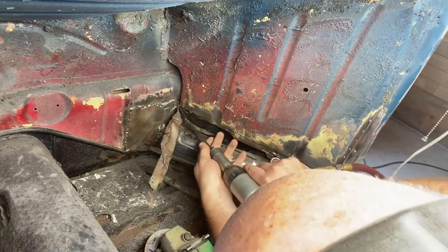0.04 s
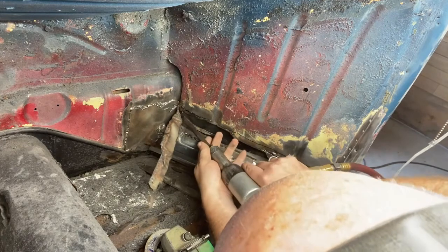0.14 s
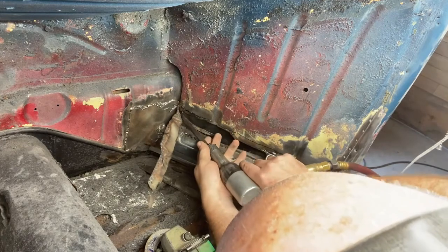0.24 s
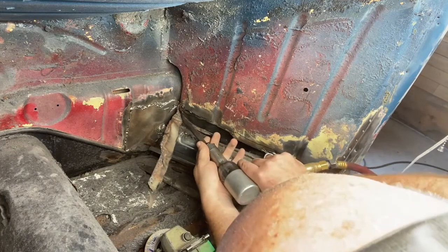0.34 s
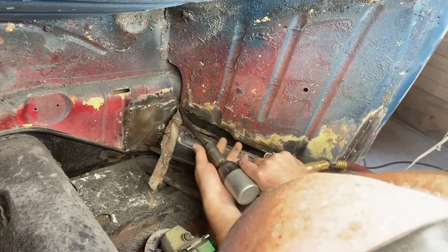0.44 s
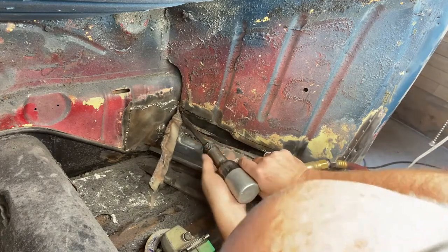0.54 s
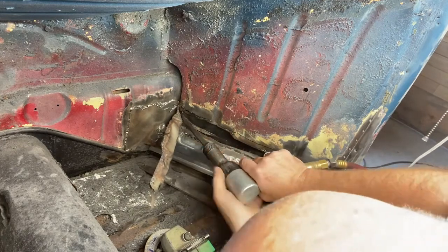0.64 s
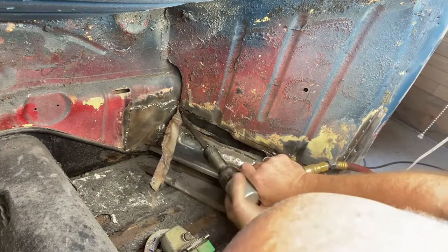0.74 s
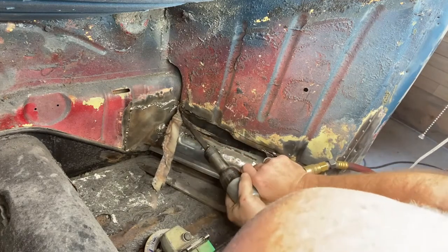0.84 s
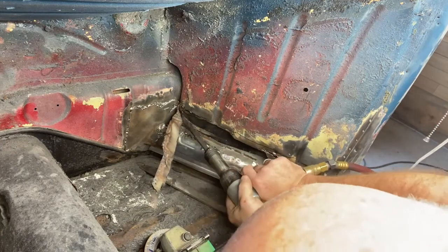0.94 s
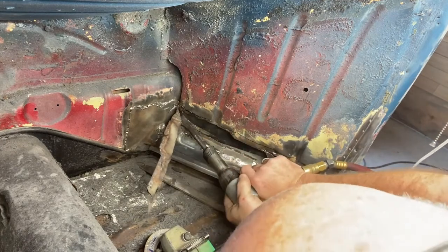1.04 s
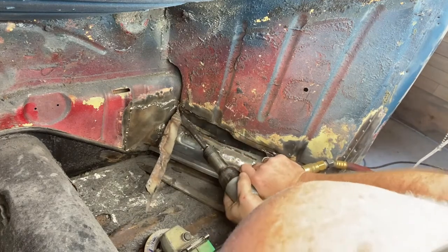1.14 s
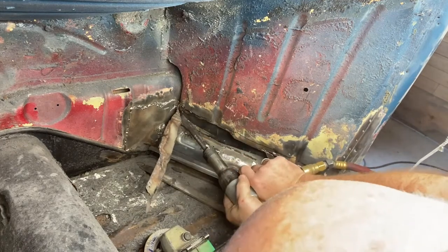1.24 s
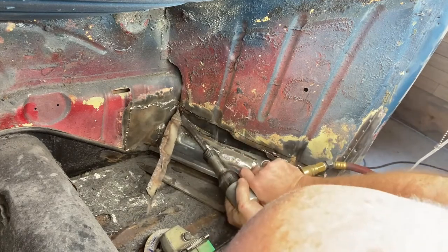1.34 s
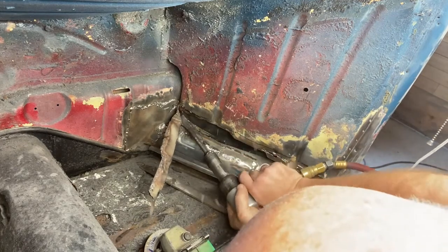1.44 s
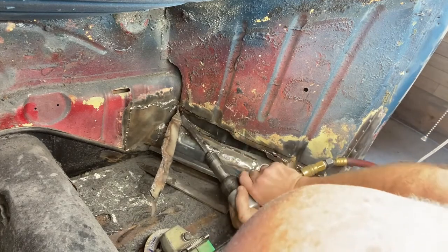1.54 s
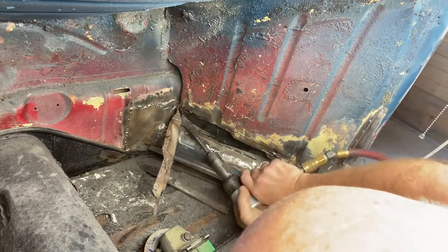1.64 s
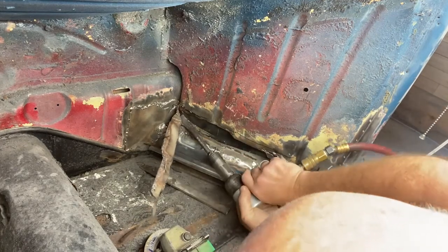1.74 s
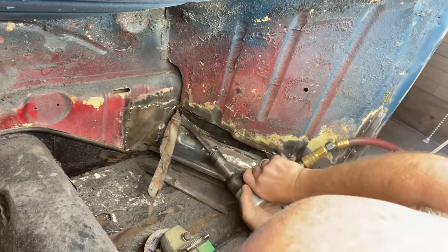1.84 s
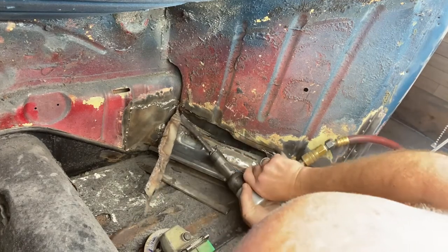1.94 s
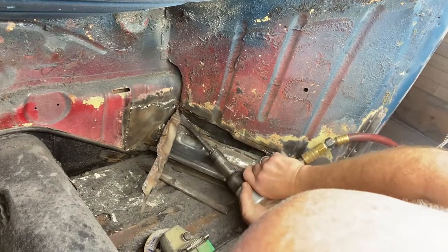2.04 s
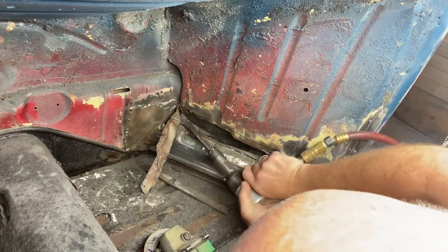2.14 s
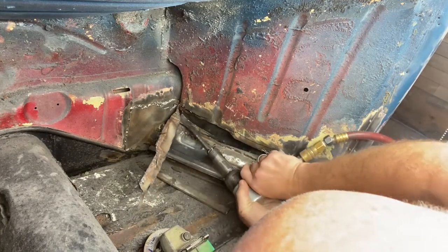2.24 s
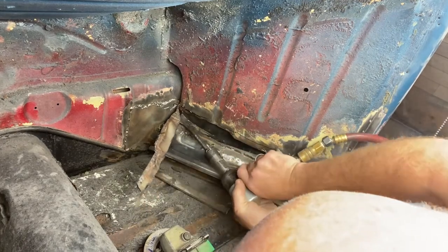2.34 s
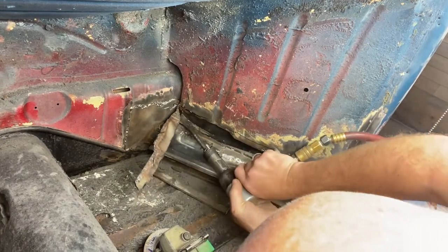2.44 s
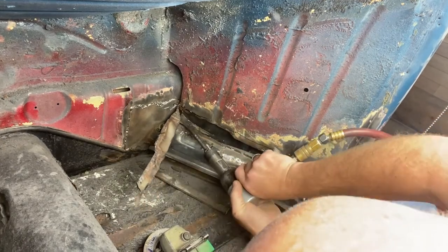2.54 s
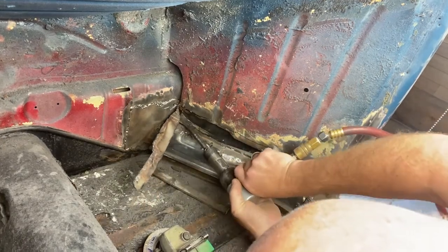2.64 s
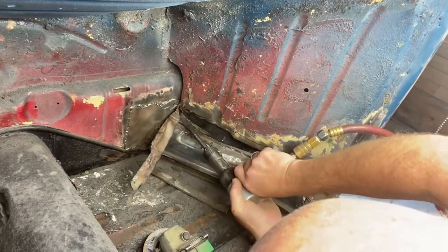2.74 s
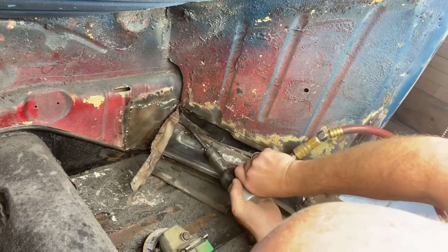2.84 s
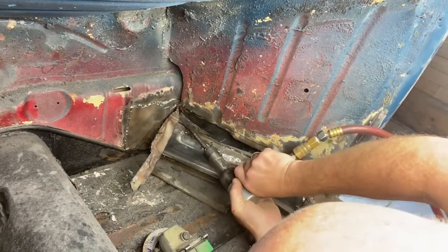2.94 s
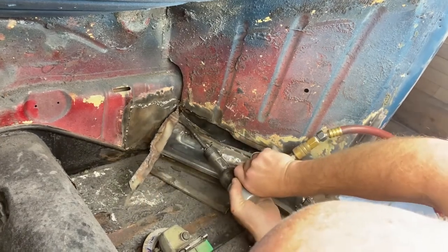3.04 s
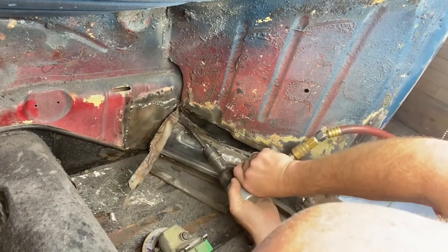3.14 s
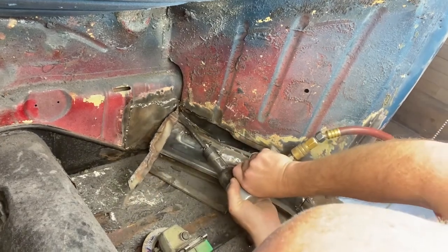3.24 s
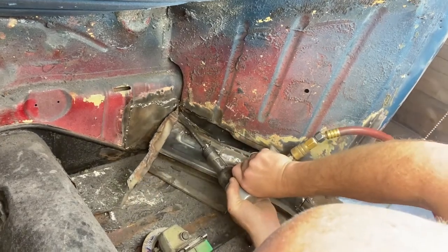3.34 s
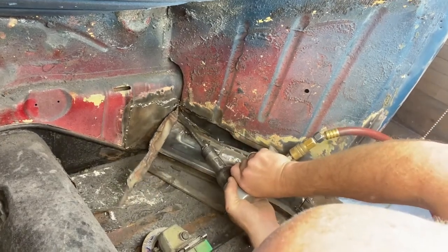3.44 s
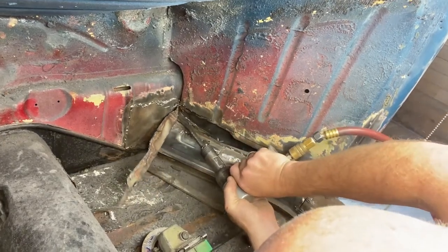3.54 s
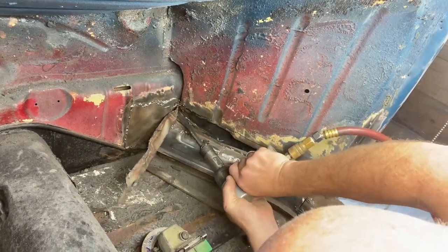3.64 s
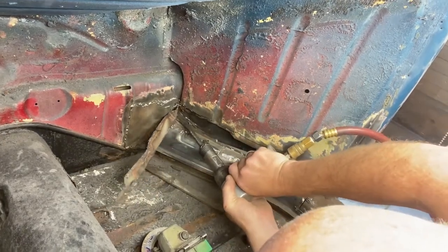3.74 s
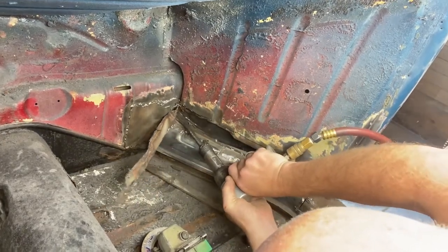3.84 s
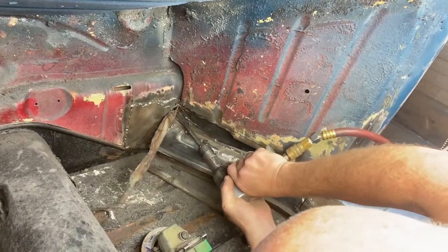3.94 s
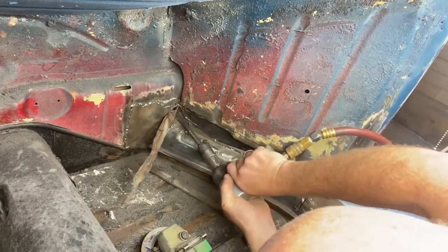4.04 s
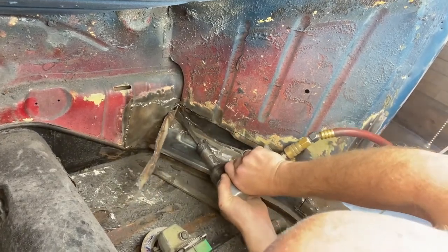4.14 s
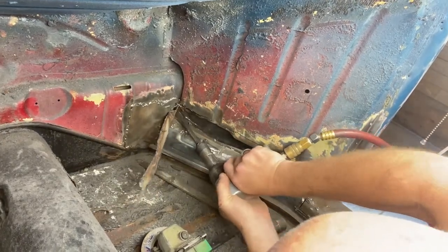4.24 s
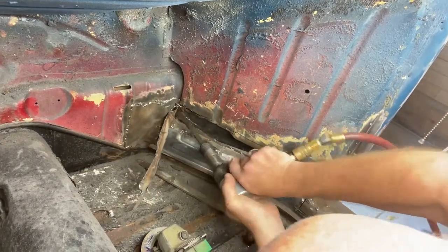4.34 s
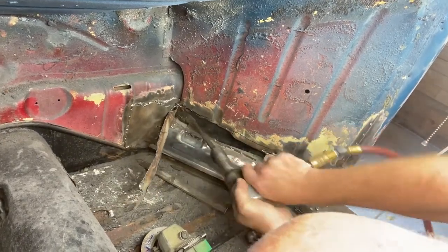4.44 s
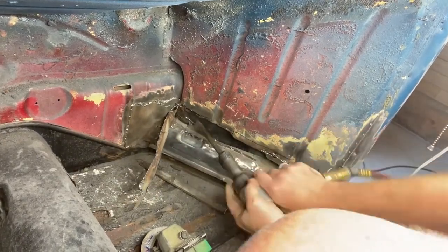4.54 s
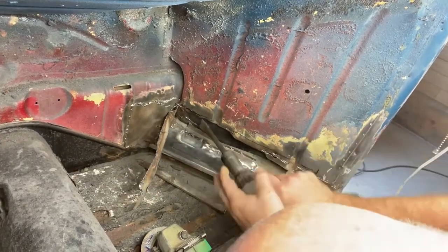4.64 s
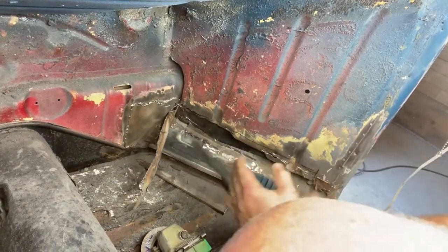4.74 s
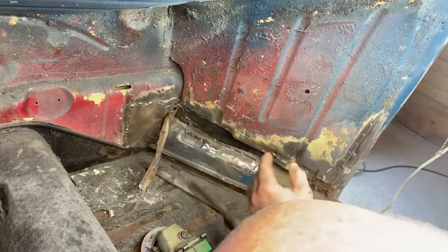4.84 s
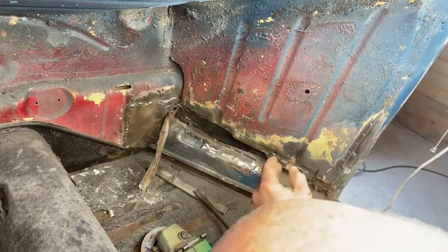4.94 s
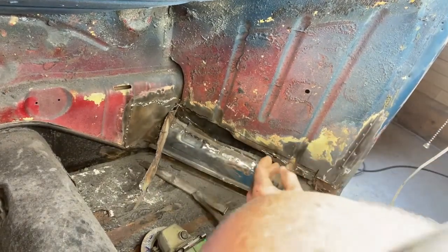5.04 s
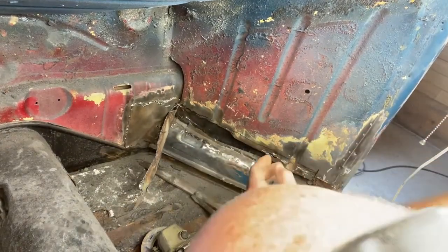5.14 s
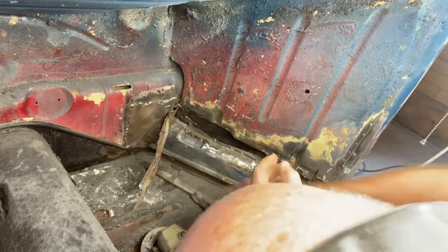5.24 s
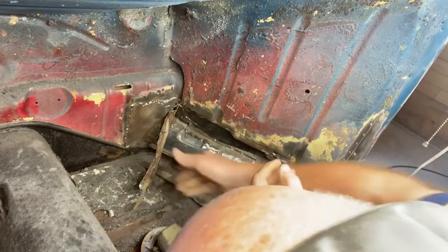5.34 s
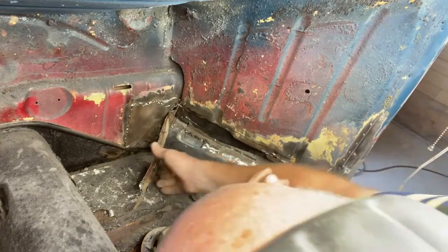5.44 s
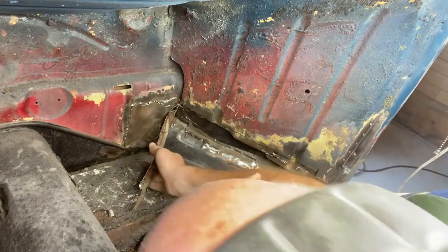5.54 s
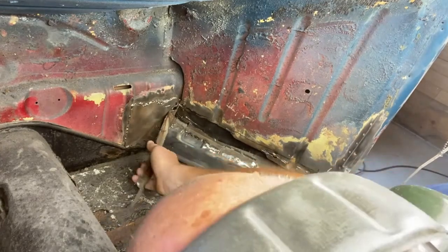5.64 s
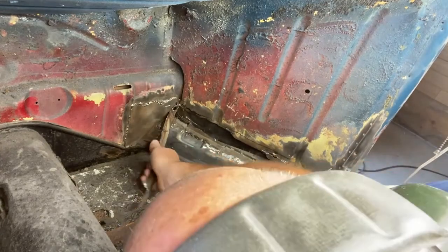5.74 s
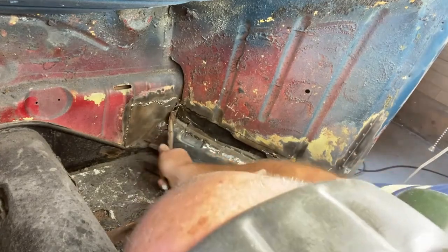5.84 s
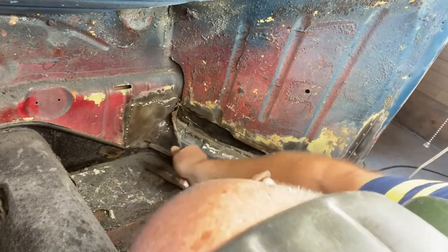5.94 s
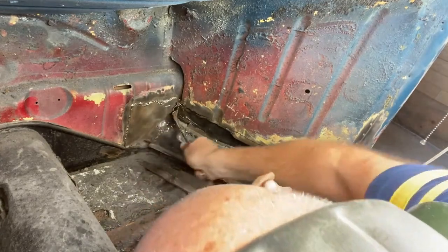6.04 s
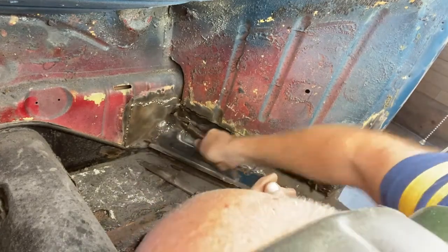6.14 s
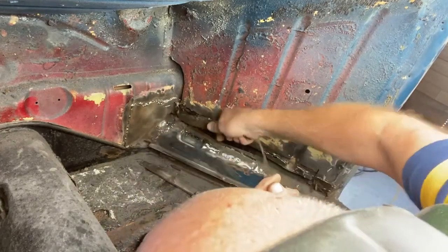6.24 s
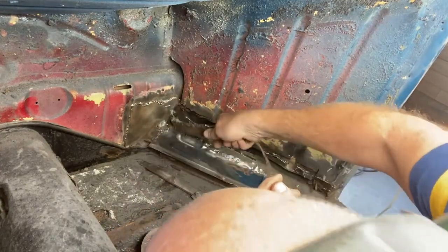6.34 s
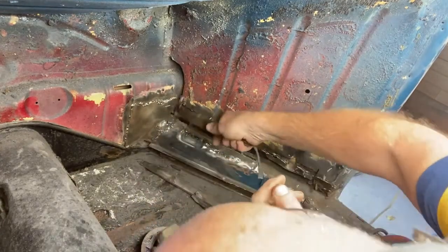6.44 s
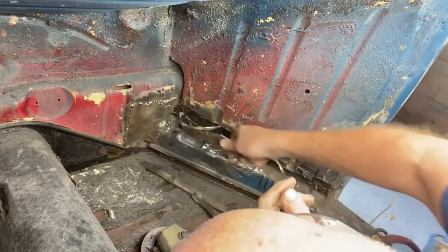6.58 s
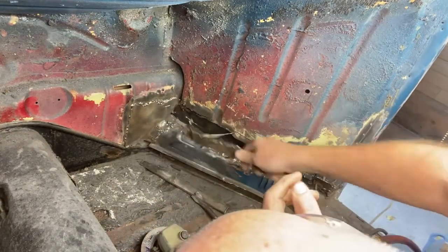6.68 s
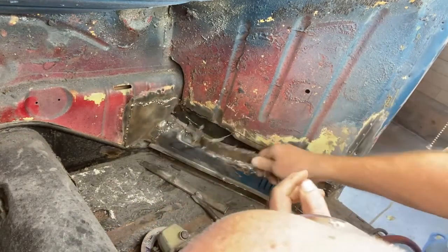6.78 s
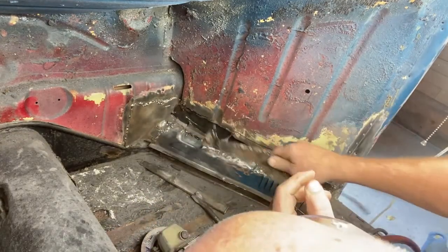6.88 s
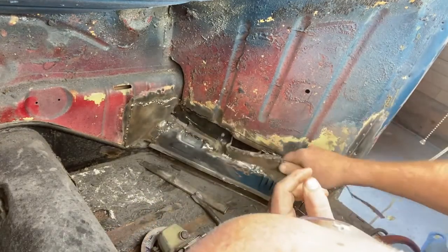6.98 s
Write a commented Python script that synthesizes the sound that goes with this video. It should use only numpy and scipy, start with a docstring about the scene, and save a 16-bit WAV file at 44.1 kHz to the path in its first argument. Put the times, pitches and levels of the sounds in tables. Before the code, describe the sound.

Close stereo recording in a garage: hands and tool knock softly on a rusty car floor, with gritty crunches and low thumps. A puff of air leads into a very brief air chisel burst, then another into a long, loud machine-gun run of bright cracks and sheet clang with hissing exhaust. It stops; the tool clanks down, and a cut metal strip scrapes and knocks.

```python
"""Air chisel on a rusty floor pan in a garage, its steady air noise a coloured random wash.
First, hands and tool knock the metal (excited modes), crunch grit (random grains) and make the pan drone (low modes).
A puff of air leads into a short burst near 1 s, another into a long one from 1.7 to 4.3 s: each blow sounds
bit, sheet and low pan modes, while the exhaust hisses (modulated noise). Afterwards the tool clanks, then loose
metal scrapes and knocks; walls and car body reverberate the knocks, puffs, blows, exhaust and scrapes."""
import sys
import numpy as np
from scipy import signal
from scipy.fft import rfft
from scipy.io import wavfile
from scipy.ndimage import uniform_filter1d

SR = 44100
rng = np.random.default_rng(int(sys.argv[2]) if len(sys.argv) > 2 else 0)


def materialize(psi):
    """Save the field psi as 16-bit PCM at rate SR to the path in sys.argv[1].

    A 1-D psi becomes a single channel; in a 2-D psi each row is a channel.
    """
    bounded = np.clip(np.atleast_2d(psi).T, -1, 1)
    quanta = np.round(bounded * 32767).astype(np.int16)
    wavfile.write(sys.argv[1], SR, quanta)


N = 309141  # length [samples]


def amp(db):
    """Decibel definition: 20 dB is a tenfold amplitude."""
    return 10 ** (np.asarray(db) / 20)


def evened(x):
    """Power normalisation: scales to rms 1."""
    return x / np.sqrt(np.mean(x ** 2) + 1e-20)


def read(points, hz):
    """Logarithmic frequency scale: interpolates a table along it."""
    f, value = np.transpose(points)
    return np.interp(np.log(hz + 1), np.log(f + 1), value)


def curve(tables, t):
    """Level envelopes: gains from tables of (time [s], level [dB], ...), practically silent outside them."""
    total = 0
    for table in tables:
        s, *levels = np.transpose(table)
        total = total + np.array([amp(np.interp(t, s, db, -150, -150)) for db in levels])
    return total


# likeness of left and right: (frequency [Hz], coherence [0 to 1])
COHERENCE = [(60, .93), (130, .65), (290, .4), (640, .3), (1410, .5), (3100, .3), (6800, .4), (15000, .85)]
# stereo balance: (frequency [Hz], left over right [dB])
BALANCE = [(60, 0), (150, 4), (380, 1.5), (950, 1), (2380, 2), (5980, 4.5), (15000, -1.5)]
# stereo phase: (frequency [Hz], lead of left [rad])
PHASE_LEAD = [(40, 2.5), (125, 0.86), (250, 1.5), (550, 2.16), (1460, 1.44), (4650, 1), (5000, -4),
              (5940, -5), (6720, -5.5), (8700, -5), (12300, 3), (16000, -7.5)]


def stereo_spectra(frames, size, colour_db):
    """Partial coherence: two noise channels share a part, with a phase lag and a balance."""
    hz = np.fft.rfftfreq(size, 1 / SR)[:, None]
    a, b, c, d = rng.standard_normal((frames, len(hz), 4)).T
    same = np.clip(read(COHERENCE, hz), -1, 1)
    left = a + 1j * b
    right = same * left + np.sqrt(1 - same ** 2) * (c + 1j * d)
    right = right * np.exp(-1j * read(PHASE_LEAD, hz))
    lean = amp(read(BALANCE, hz) / 2)
    return hz, np.array([left * lean, right / lean]) * amp(read(colour_db, hz))


def steady_noise(size, colour_db):
    """Stationary noise: overlapping random spectra, rms 1."""
    z = stereo_spectra(4 * N // size + 5, size, colour_db)[1]
    return evened(signal.istft(z, nperseg=size, noverlap=3 * size // 4)[1][:, :N])


def dense_ring(colour_db, t60s, seconds):
    """High modal density: countless close modes merge into dying stereo noise, energy 1."""
    frames = int(seconds * SR / 64)
    hz, z = stereo_spectra(frames, size=256, colour_db=colour_db)
    t = np.maximum(np.arange(frames) - 2, 0) * 64 / SR
    t60 = read(t60s, hz)
    decay = amp(-60 * t / t60) / np.sqrt(t60)
    x = signal.istft(z * decay, nperseg=256, noverlap=192)[1][:, 128:]
    return x / np.linalg.norm(x.mean(0))


# times at which the bit stands at seven places along the weld: (time [s])
STATIONS = 1.1, 1.85, 2.25, 2.7, 3.05, 3.5, 4.0


def modes(table, length, s, spread, uneven_db):
    """Modal excitation: decaying sines, weighted by the spot struck at time s and by chance; energy 1."""
    t, x = np.arange(length) / SR, 0
    for hz, t60, *db in table:
        shift, strength, swing = rng.standard_normal(3)
        level_db = np.interp(s, STATIONS[-len(db):], db) + uneven_db * strength
        turn = 2 * np.pi * hz * (1 + spread * shift) * t
        # a quadrature part of opposite sign left and right
        side = (0.3 + 0.28 * swing) * np.array([[1], [-1]]) * np.cos(turn)
        x = x + amp(level_db - 60 * t / t60) / np.sqrt(t60) * (np.sin(turn) + side)
    x = x * np.minimum(t / 0.0006, 1) ** 2
    return x * amp(np.array([[1.2], [-1.2]])) / np.linalg.norm(x.mean(0))


def rattle(lengths, lumpy_db, rise, alike, colour_db, tick):
    """Repeated contact: a solid tick and an uneven run of chatter, partly alike from hit to hit."""
    t = np.arange(2600) / SR
    z = rng.standard_normal((len(lengths), 2, len(t)))
    # correlation from one hit to the next, steady from the first
    fresh = np.sqrt(1 - alike ** 2)
    z[0] /= fresh
    z = signal.lfilter([fresh], [1, -alike], z, axis=0)
    lumps = amp(lumpy_db * evened(uniform_filter1d(z[:, 1], 40)))
    decay = np.exp(-t / lengths[:, None])
    runs = z[:, 0] * lumps * decay * np.minimum(t / rise, 1) ** 2
    # chatter has energy 1 within the colour it feeds
    weight = evened(amp(read(colour_db, np.fft.rfftfreq(len(t), 1 / SR))))
    runs = runs / np.sqrt(np.mean(abs(rfft(runs) * weight) ** 2, 1, keepdims=True))
    return (runs + tick * (t == t[12])) / np.sqrt(1 + tick ** 2)


def strike(times, runs, db, body, spots):
    """Linear superposition: hits convolved with the body's response, redrawn for each group of hits."""
    out = np.zeros((2, N))
    at = np.round(np.asarray(times) * SR).astype(int)
    for part in np.array_split(np.arange(len(at)), spots):
        start = at[part[0]]
        drive = np.zeros(at[part[-1]] - start + runs.shape[1])
        for k in part:
            drive[at[k] - start:][:runs.shape[1]] += amp(db[k]) * runs[k]
        rung = signal.fftconvolve(drive[None], body(times[part].mean()), axes=1)[:, :N - start]
        out[:, start:][:, :rung.shape[1]] += rung
    return out


# dense ring of the sheet: (frequency [Hz], decay time t60 [s])
RING = [(200, 0.36), (700, 0.23), (2000, 0.14), (5000, 0.077), (9000, 0.051), (15000, 0.03)]


def hits(s, lengths, db, colour_db, table, modes_db, spread, uneven_db, rise, alike, tick, size):
    """Impact response: contacts drive a dense ring plus named modes; about size hits share a spot."""
    def body(when):
        """Modal sum: dense ring and separate modes."""
        ring = dense_ring(colour_db, RING, seconds=0.4)
        return ring + amp(modes_db) * modes(table, ring.shape[1], when, spread, uneven_db)
    runs = rattle(lengths, 2.3, rise, alike, colour_db, tick)
    return strike(s, runs, db, body, len(s) // size)


# colour of the garage air: (frequency [Hz], relative density [dB per Hz])
AIR = [(15, -42.5), (25, -6.5), (70, 8.5), (243, -22), (527, -25), (1200, -18), (1560, -33), (4270, -41.5),
       (12000, -65), (15600, -88.5), (22000, -120)]


def air():
    """Stationary broadband noise: the quiet wash of the garage."""
    return amp(-65.5) * steady_noise(1024, AIR)


# grit and rumble, one table a stretch: (time [s], relative grit level [dB], rumble level [dB])
GRIT = [
    [(0.0, -58, -55.5), (0.344, -51, -44.5), (0.93, -56.5, -58)],
    [(1.25, -35, -34), (1.444, -50.5, -36.5), (1.735, -55.5, -57)],
    [(4.35, -55, -47), (4.71, -87, -68.5), (4.92, -89, -63), (5.06, -44, -55), (5.32, -71, -52),
     (5.96, -71.5, -71), (6.2, -54.5, -57), (6.45, -46, -52), (6.62, -61.5, -57), (7.01, -62.5, -55.5)],
]
# colour of the grit: (frequency [Hz], relative density [dB per Hz])
GRIT_COLOUR = [(120, -44.5), (200, -20), (297, -3.5), (447, -25), (641, -8.5), (774, -11.5), (951, -20.5),
               (5650, -40), (12000, -72.5), (15600, -99), (22000, -120)]
# colour of the rumble: (frequency [Hz], relative density [dB per Hz])
RUMBLE = [(25, -37), (45, -24), (65, -1), (130, -7.5), (250, -8.5), (400, -24.5), (800, -81)]


def grit():
    """Shot noise: sparse rust grains crunch under hand and tool, over a low rumble of the car body."""
    sizes = rng.standard_normal(N) * amp(2.2 * rng.exponential(1, N))
    grains = sizes * (rng.random(N) < 2500 / SR)  # on average 2500 grains per s
    ring = dense_ring(GRIT_COLOUR, [(200, 0.12), (5000, 0.05)], seconds=0.2)
    crunch, rumble = curve(GRIT, np.arange(N) / SR)
    low = steady_noise(2048, RUMBLE)
    crunching = signal.fftconvolve((evened(grains) * crunch)[None], ring, axes=1)[:, :N]
    return amp(-8.5) * crunching + rumble * low


# knocks of tool and loose metal, and two short puffs of air just before the bursts (0.963 and 1.723 s):
# (time [s], relative crack or hiss level [dB], relative sheet level [dB], noise decay [s])
KNOCKS_AND_PUFFS = [(0.071, -43, -45, 0.011), (0.101, -40, -40.5, 0.016), (0.128, -43.5, -32.5, 0.02),
                    (0.166, -57, -54, 0.034), (0.258, -47, -47.5, 0.036), (0.297, -61, -45.5, 0.034),
                    (0.328, -54, -44.5, 0.011), (0.372, -64, -49, 0.011), (0.928, -24.5, -32, 0.037),
                    (0.963, -7.5, -28, 0.11), (1.35, -35, -45, 0.031), (1.6135, -29, -39, 0.01),
                    (1.723, -16.5, -37.5, 0.053), (4.338, -35, -62, 0.0028), (4.871, -36, -42, 0.02),
                    (4.903, -33, -39.5, 0.016), (5.082, -44, -35.5, 0.012), (5.134, -45, -43, 0.012),
                    (5.15, -41, -52, 0.013), (5.192, -45.5, -66.5, 0.0087), (5.519, -70.5, -68, 0.0055),
                    (5.749, -63.5, -65, 0.0055), (5.964, -48, -49.5, 0.016), (5.9933, -29, -44, 0.0037),
                    (6.031, -41.5, -48, 0.0057), (6.104, -41, -86, 0.0077), (6.15, -25, -41, 0.015),
                    (6.183, -36, -43, 0.011), (6.251, -33.5, -43, 0.0096), (6.262, -22, -33.5, 0.008),
                    (6.298, -24.5, -27.5, 0.01), (6.341, -32, -39, 0.023), (6.375, -41, -49, 0.0042),
                    (6.466, -42, -69, 0.011), (6.667, -25.5, -38, 0.015)]
# dull crack of a knock, also the hiss of a puff: (frequency [Hz], relative density [dB per Hz])
KNOCK = [(1060, -10), (1800, -1), (2480, -7.5), (2760, -10), (3040, -9.5), (3290, -11), (4300, -11),
         (6460, -16.5), (8500, -37), (10500, -83), (15000, -105)]
# broad colour of the sheet: (frequency [Hz], relative density [dB per Hz])
SHEET = [(110, -50), (200, -0.5), (407, 2), (455, 2.5), (651, 1), (920, 3.5), (1230, -8), (1570, -8),
         (2600, -15.5), (3380, -32), (5720, -120)]
# modes of the chisel bit: (frequency [Hz], t60 [s], relative level at each of the last six stations [dB])
BIT = [(3780, 0.0029, -13.5, -16.5, -21, 9, 1, 0), (4000, 0.022, 1.5, 1.5, -3.5, -6, -5, -15),
       (4707, 0.048, 0, -3.5, -4.5, -13.5, -11, 0), (6113, 0.032, -9, -9, -11, -9.5, 1.5, -17),
       (6164, .035, -11, -17.5, -14, -23, -37, 2), (6640, 0.045, -12, -16, -15, -17, 3, -19.5)]
# strongest modes of the sheet: (frequency [Hz], t60 [s], relative level at each of seven stations [dB])
PANEL = [(304, 0.58, -13, -19, -14.5, -8, -4, -16.5, -27),
         (338, 0.11, -19.5, -18, -26.5, -1.5, -8, -32.5, -49),
         (412.3, 0.24, -3, -5.5, -0.5, -11.5, 3.5, -26.5, -3.5),
         (569.3, 0.13, -21, -17.5, -12.0, 2.5, -3.5, -6, -2.5),
         (644.7, 0.097, -8.5, -1, -2.5, -1.5, -1, 0.5, 5.5),
         (738.3, 0.13, -5, -12, -4.5, 1.5, -9, -15.5, -36),
         (807.5, 0.25, -11, -8, -4, -8.5, 4, -26.5, -17.0),
         (883.2, 0.113, -4.5, -3, -6.5, -24.5, -6, -1.5, 0.5), (933.5, 0.083, -14, -4, -5.5, -7, -4, -2, 4),
         (1060, 0.072, 1, -6.5, -10.5, -6, -11, 0, -22), (1156, 0.2, -11, -4.5, -11.0, -6.5, -6.5, -3.5, 3),
         (1452, 0.08, -9.5, -4.5, -12, -27, -1, 3, -5), (1559, 0.12, -8.5, -11.5, -16, -8.0, -6, -12, -0.5),
         (1857, 0.092, -22.5, -3, -15, -9.5, -12.5, -16, -18)]
# modes of the loose strip: (frequency [Hz], t60 [s], relative level [dB])
STRIP = [(792, 0.13, 4), (1193, 0.15, 0), (1378, 0.17, 2.5), (1920, 0.16, 6), (2018, 0.11, 2),
         (2240, 0.11, -11), (2750, .09, -23), (3274, 0.065, -7), (3640, 0.046, -15.5)]
# the tool lifted off and laid down: (time [s], relative level [dB])
CLANKS = [(4.8781, -39.5), (4.907, -40.5)]
# modes of the tool's free steel: (frequency [Hz], t60 [s], relative level [dB])
STEEL = [(1168, .15, -3), (1600, .25, -17), (2070, .08, -7), (3290, .05, -11), (4270, .02, -10),
         (4845, .14, -16), (6700, .035, -4), (6772, .22, -17)]
LOOSE_S = 5.9  # from here on the hand works the cut strip [s]


def knocks_and_puffs():
    """Soft excitation: slow-rising noise makes dull knocks and two puffs; the laid-down tool rings freely."""
    s, crack_db, sheet_db, length = np.transpose(KNOCKS_AND_PUFFS)
    crack = 0
    for chosen, table, db in [(s < LOOSE_S, BIT, -20.0), (s >= LOOSE_S, STRIP, -0.5)]:
        crack = crack + hits(s[chosen], length[chosen], crack_db[chosen], KNOCK, table, modes_db=db,
                             spread=0.01, uneven_db=6.5, rise=0.0029, alike=0, tick=0.18, size=1)
    clang = hits(s, length, sheet_db, SHEET, PANEL, modes_db=-7.5,
                 spread=0.024, uneven_db=2.5, rise=0.0041, alike=0, tick=0.49, size=2)
    s, db = np.transpose(CLANKS)
    runs = rattle(np.full(len(s), 0.003), 1.9, 0.00034, 0, KNOCK, tick=0.35)

    def steel(when):
        """Free vibration: the modes of the tool."""
        return modes(STEEL, SR // 3, when, spread=0.001, uneven_db=1.5)
    clank = strike(s, runs, db, steel, 1)
    return amp(16.5) * crack + amp(28.0) * clang + amp(27.5) * clank


# decay of the room: (frequency [Hz], t60 [s])
GARAGE = [(200, 0.31), (700, 1), (2000, 0.41), (5000, 0.45), (10000, 0.25)]


def garage(x):
    """Reverberation: walls and car body return the sound a little late."""
    walls = dense_ring([(100, 0), (3000, -1.5), (10000, -4)], GARAGE, seconds=1)
    walls = np.pad(walls, ((0, 0), (300, 0)))  # 7 ms late
    return signal.fftconvolve(x.mean(0)[None], walls, axes=1)[:, :N]


# the pan flexing under a knee, hand or dropped tool:
# (time [s], mean frequency [Hz], level before wobble [dB], held [s])
THUMPS = [(0.122, 193, -35.5, 0.0052), (0.152, 136.6, -34.5, 0.098), (0.356, 135, -41.5, 0.089),
          (0.5, 131.4, -46, 0.17), (0.849, 125, -49.5, 0.053), (.932, 143, -22.5, 0.0024),
          (1.362, 138.6, -37, 0.065), (1.406, 67.3, -33, 0.066), (4.887, 122, -46, 0.011),
          (5.086, 101.4, -23.5, 0.0039), (5.101, 178.3, -41.5, 0.093), (5.127, 103.4, -31, 0.016),
          (5.203, 122.5, -39.5, 0.027), (5.355, 100, -53.5, 0.027), (5.51, 88.2, -54, 0.086),
          (6.299, 187, -46.5, 0.1), (6.305, 303, -35, 0.012), (6.695, 133, -43.5, 0.092),
          (6.694, 181, -41.5, 0.067), (6.837, 131, -47, 0.06)]
SWELL_S, THUMP_T60_S = 0.00079, 0.15


def thumps():
    """Single-mode response: each low mode swells, is held while the weight shifts, then decays."""
    out, t = np.zeros((2, N)), np.arange(SR) / SR
    for s, hz, db, held in THUMPS:
        wobble = evened(uniform_filter1d(uniform_filter1d(rng.standard_normal(SR), 600), 600))
        decay_db = -60 * np.maximum(t - held, 0) / THUMP_T60_S
        shape = np.minimum(t / SWELL_S, 1) * amp(db + 0.82 * wobble + decay_db)
        turn = 2 * np.pi * np.cumsum(hz * (1 + 0.023 * wobble)) / SR
        tone = np.sqrt(2) * shape * np.sin(turn - [[0], [0.0064 * hz]])  # right lags
        part = out[:, round(s * SR):][:, :SR]
        part += tone[:, :part.shape[1]]
    return out


# piston speed, one table a burst; it sags while the bit bites into the weld: (time [s], rate [blows per s])
PISTON = [
    [(0.9752, 31.6), (1.1, 31.86), (1.15, 11.01)],
    [(1.7388, 33.43), (1.9, 33.0), (2.1, 27.14), (2.3, 24.35), (2.46, 23.84), (2.55, 25.8), (2.59, 32.75),
     (2.7, 33.89), (3.3, 33.96), (3.45, 33.76), (4.06, 33.84), (4.12, 32.11), (4.22, 31.62), (4.268, 27.58)],
]


def blows():
    """Phase accumulation: one blow at each whole turn of the piston."""
    out = []
    for s, rate in map(np.transpose, PISTON):
        t = np.arange(s[0], s[-1], 1 / SR)
        turns = np.cumsum(np.interp(t, s, rate)) / SR
        out.append(np.interp(np.arange(int(turns[-1]) + 1), turns, t))
    return np.concatenate(out)


# bearing of bit on sheet, exhaust air and shake of the whole pan, one table a burst:
# (time [s], relative sheet level [dB], relative exhaust level [dB], shake [dB])
LOAD = [
    [(0.972, -15.5, -78, 1.9), (1.104, -16.5, -54, 1.5), (1.34, -38.5, -68, -47)],
    [(1.73, -9.5, -61, -9.5), (1.74, -15, -69, -1), (1.91, -21.5, -29.5, -4.5), (1.96, -22, -30.5, -8.5),
     (2.56, -22, -42.5, -10.5), (2.61, -19, -34.5, -13.5), (2.81, -25.5, -31, -17.5),
     (4.04, -27.5, -35.5, -20), (4.28, -31, -43.5, -27), (4.42, -55, -82.5, -54)],
]
# strength of the crack, one table a burst: (time [s], relative level [dB])
FORCE = [
    [(.97, -9.5), (1.01, -13), (1.1, -12.5), (1.155, -19)],
    [(1.73, -7.5), (1.77, -12), (1.95, -11), (2.24, -12.5), (2.4, -19), (2.47, -15.5), (2.56, -15),
     (2.6, -12.5), (2.7, -13.5), (3.0, -12.5), (3.5, -15), (4.22, -16.5), (4.275, -19)],
]
# broad colour of the crack: (frequency [Hz], relative density [dB per Hz])
CRACK = [(1060, -1.5), (1800, -2), (2750, -7), (4050, -4.5), (4280, -4), (4660, -4), (5300, -8),
         (6310, -7.5), (7120, -14.5), (9130, -19.5), (10600, -44.5), (12500, -35.5), (14400, -26.5),
         (15500, -46.5), (16300, -75.5)]
JITTER_S, UNEVEN_DB = 0.00016, 0.8  # chance spread of blow time [s] and of crack level [dB]
CHATTER_S = 0.0035  # decay of the bit's chatter after a blow [s]
ALIKE, CRACK_TICK, CLANG_TICK = 0.65, 0.8, 1.5  # likeness to the blow before; solid contact against chatter


def chisel():
    """Impulsive excitation: each piston blow gives a bright crack of the bit and a clang of the sheet."""
    s = blows()
    s = s + JITTER_S * rng.standard_normal(len(s))
    crack_db = 20 * np.log10(curve(FORCE, s)[0]) + UNEVEN_DB * rng.standard_normal(len(s))
    sheet_db = 20 * np.log10(curve(LOAD, s)[0]) + 0.23 * rng.standard_normal(len(s))
    crack = hits(s, np.full(len(s), CHATTER_S), crack_db, CRACK, BIT, modes_db=-7.0,
                 spread=0.0067, uneven_db=4.0, rise=0.0008, alike=ALIKE, tick=CRACK_TICK, size=3)
    clang = hits(s, np.full(len(s), 0.003), sheet_db, SHEET, PANEL, modes_db=0.87,
                 spread=0.002, uneven_db=0.3, rise=0.00089, alike=ALIKE, tick=CLANG_TICK, size=3)
    return amp(20.5) * crack + amp(28.0) * clang


# low modes of the pan under the hammer:
# (frequency [Hz], t60 [s], right lag [rad], level at 0 dB shake [dB], level change per dB of shake [dB])
PAN = [(65, 0.065, 0.95, -9, 1.32), (136, 0.11, 0.6, -19, 0.76), (190, 0.05, 1, -18.5, 3.5)]
DETUNE = 0.13  # chance shift of the lowest mode from blow to blow [share]; higher modes shift less


def flex():
    """Low-order plate modes: each blow thumps the pan, uneven in strength and pitch."""
    s, t, out = blows(), np.arange(SR // 5) / SR, np.zeros((2, N))
    chance = rng.standard_normal((len(s), len(PAN), 2))
    for when, shake, draws in zip(s, curve(LOAD, s)[2], chance):
        for (hz, t60, lag, db, follow), (uneven, shift) in zip(PAN, draws):
            decay = amp(db + 4.7 * uneven - 60 * t / t60)
            shape = np.minimum(t / 0.0056, 1) * shake ** follow * decay
            turns = hz * (1 + DETUNE * shift * (PAN[0][0] / hz) ** 2) * t
            tone = np.sqrt(2) * shape * np.sin(2 * np.pi * turns - [[0], [lag]])
            out[:, round(when * SR):][:, :len(t)] += tone
    return out


def stroke(depth, recovery):
    """Exponential relaxation: 1 at rest; each blow drops it to 1 - depth, then it rises toward 1 + depth."""
    t, s = np.arange(N) / SR, blows()
    since = t - s[np.maximum(np.searchsorted(s, t) - 1, 0)]
    busy = (since > 0) & (since < 0.045)
    pulse = 1 + depth - 2 * depth * np.exp(-abs(since) / recovery)
    return uniform_filter1d(np.where(busy, pulse, 1), 130)  # smoothed over 3 ms


# colour of the exhaust: (frequency [Hz], relative density [dB per Hz])
EXHAUST = [(500, -14), (1500, 8.5), (3000, 2), (6000, -5), (8000, -18.5), (10500, -31), (14000, -28),
           (16000, -44)]


def exhaust():
    """Amplitude-modulated noise: air rushes from the ports, dipping at each blow and building up after it."""
    hiss = steady_noise(256, EXHAUST)
    flow = curve(LOAD, np.arange(N) / SR)[1]
    return amp(-1.5) * hiss * flow * stroke(depth=0.9, recovery=0.004)


# loose metal dragged over the pan: (time [s], length [s], relative level [dB], low-pass edge [Hz])
SCRAPES = [(4.486, 0.058, -65.5, 3980), (4.573, 0.06, -67, 1980), (5.939, 0.047, -64.5, 2510),
           (6.332, 0.056, -62, 4000), (6.523, 0.092, -75, 2510), (6.649, 0.014, -64, 2014)]


def scrapes():
    """Friction excitation: gritty drags swell and fade; from LOOSE_S on they also ring the strip."""
    out = np.zeros((2, N))
    for s, length, db, hz in SCRAPES:
        t = np.arange(0, length, 1 / SR)
        grains = rng.standard_normal(len(t)) * amp(3.75 * rng.exponential(1, len(t)))
        friction = evened(signal.lfilter(*signal.butter(1, hz, fs=SR), grains))
        drag = friction * np.sin(np.pi * t / length) ** 2
        ring = dense_ring(KNOCK, RING, seconds=0.3)
        if s >= LOOSE_S:
            ring = ring + amp(-6.0) * modes(STRIP, ring.shape[1], s, spread=0.012, uneven_db=3.0)
        rung = amp(db) * signal.fftconvolve(drag[None], ring, axes=1)
        start = round(s * SR)
        out[:, start:][:, :rung.shape[1]] += rung[:, :N - start]
    return out


def scene():
    """Superposition: all sources, with reverberation on metal, puffs and exhaust."""
    # low cut at 75 Hz; the deep bass is left to rumble, thumps and low pan modes
    low_cut = signal.butter(3, 75, "high", fs=SR, output="sos")
    work = signal.sosfilt(low_cut, chisel() + exhaust() + knocks_and_puffs() + scrapes())
    return air() + grit() + work + amp(-16.0) * garage(work) + thumps() + flex()


def record(dry):
    """Transducer limits: the microphone drops deep bass and saturates softly; a band limit follows."""
    thinned = signal.sosfilt(signal.butter(3, 39.8, "high", fs=SR, output="sos"), dry)
    held = 1.346 * np.tanh(thinned / 1.393)
    band = signal.firwin(511, 16100, window=("kaiser", 9), fs=SR)
    return signal.oaconvolve(held, band[None], "same")


dry = scene()
out = record(dry)
materialize(out)
```